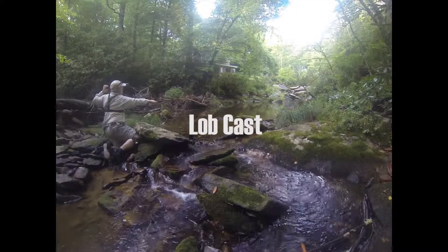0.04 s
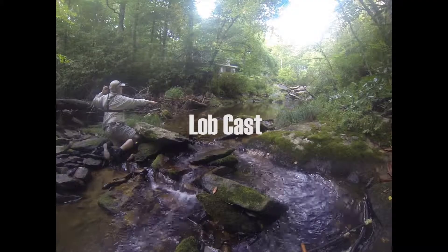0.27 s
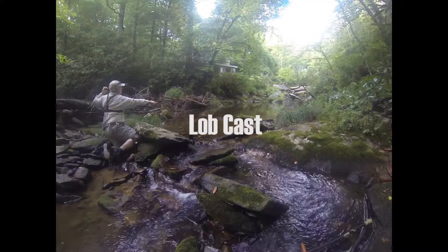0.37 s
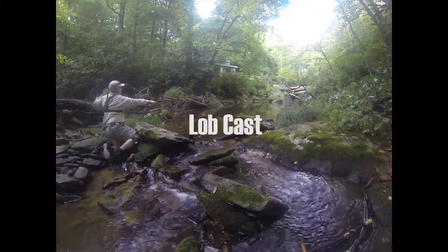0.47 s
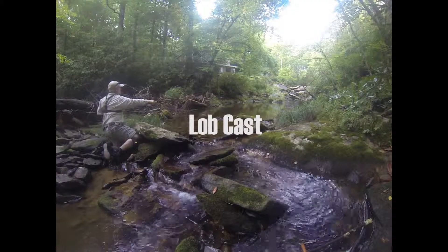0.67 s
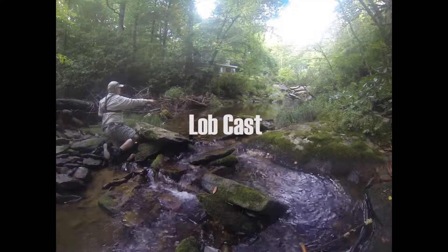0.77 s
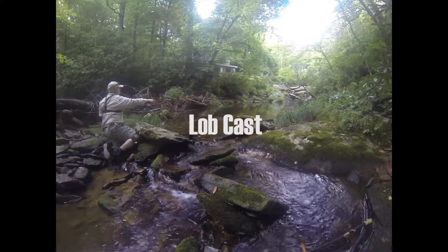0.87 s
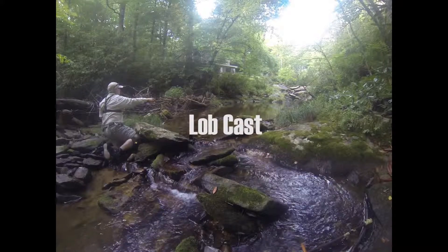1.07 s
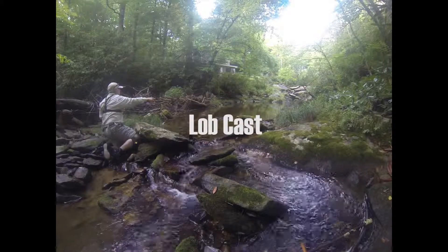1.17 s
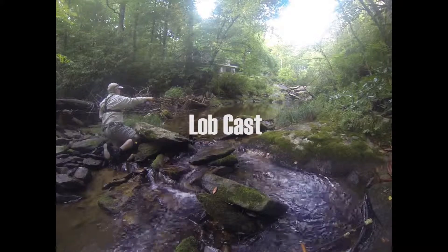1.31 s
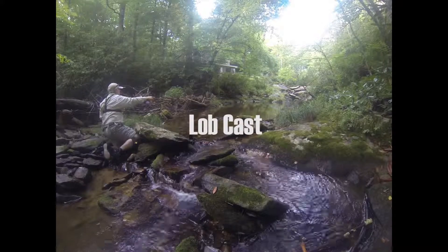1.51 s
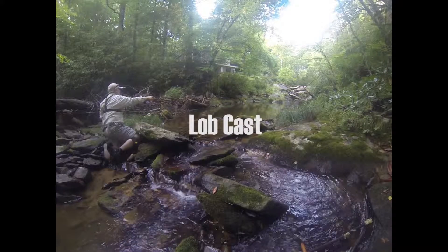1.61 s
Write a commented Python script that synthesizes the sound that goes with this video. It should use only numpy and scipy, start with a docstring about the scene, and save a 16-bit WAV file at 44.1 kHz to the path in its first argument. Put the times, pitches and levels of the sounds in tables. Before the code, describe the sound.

A small stream trickles over rocks with hollow plops, bubbly gulps and a low rush.

```python
"""A small stream trickles over rocks, hollow and dull through a camera's closed waterproof case.
From the start, drops plop into a pool and trapped air bubbles plink, over a bed of low rush, fine
patter and the faint pulsing whine of the camera's electronics. A quarter second in, big bubbles gulp
and the water heaves. Lighter drops follow, bunch into a flurry from 1.2 s, and give way to one soft
gulp at 1.6 s."""
import sys
import numpy as np
from scipy import signal
from scipy.fft import rfft, irfft
from scipy.io import wavfile
from scipy.ndimage import uniform_filter1d

SR = 44100
rng = np.random.default_rng(int(sys.argv[2]) if len(sys.argv) > 2 else 0)


def to_wav(sig):
    """Store sig (one row per channel, or 1-D mono) as 16-bit WAV at the path in sys.argv[1].

    Samples outside -1..1 are clipped; the rate is SR.
    """
    pcm = np.clip(np.atleast_2d(sig), -1, 1) * 32767
    pcm = np.round(pcm).astype(np.int16)
    wavfile.write(sys.argv[1], SR, pcm.T)  # frames by channels


N = 72765
T = np.arange(N) / SR

# tone of the current's rush: (frequency [Hz], relative level [dB])
RUSH_EQ = [(20, -12), (42, -13), (59, 5), (80, -7), (103, 3), (128, -2), (165, -1), (192, 1), (230, -15),
           (600, -11), (790, -24), (980, -14), (1450, -19), (2400, -22), (3600, -32), (5300, -39),
           (7500, -37.5), (13500, -49), (15000, -64)]
# big bubbles: (time [s], pitch [Hz], level [dB], t60 [s], pitch rise over t60 [fraction])
GULP_CUES = [(.2298, 1490, 6.5, .012, .42), (.2790, 1560, -22, .025, .1), (.2838, 1850, -4.5, .022, .07),
             (1.5985, 1225, -18.5, .046, .02)]
# small bubbles: (time [s], pitch [Hz], level [dB], t60 [s])
PLINK_CUES = [(.0170, 530, -36, .06), (.0400, 2100, -42, .04), (.1700, 2900, -26, .01),
              (.1840, 5250, -43, .016), (.3385, 3290, -20, .012), (.4190, 4250, -42, .02),
              (.5520, 3250, -39, .02), (.5810, 1880, -36, .035), (.6545, 560, -32, .055),
              (.7130, 3500, -36, .02), (.8510, 2990, -17, .015), (.9120, 4150, -36, .022),
              (.9633, 3220, -19, .016), (.9640, 3620, -25, .015), (1.0490, 1900, -37, .04),
              (1.0690, 4850, -43, .014), (1.0980, 1950, -34, .045), (1.2210, 3950, -27, .013),
              (1.2280, 4200, -17.5, .007), (1.2295, 4700, -25, .009), (1.3000, 6800, -35, .009),
              (1.3768, 2150, -27, .016), (1.3872, 2850, -20, .018), (1.4380, 2850, -25, .015),
              (1.4695, 6800, -43, .015), (1.6185, 4180, -34, .02)]
# low heave of the water under the first gulp: (time [s], pitch [Hz], level [dB], t60 [s])
HEAVE_CUES = [(.238, 75, -28, .11), (.237, 380, -17, .028)]
# drops hitting the pool: (time [s], plop level [dB], knock level [dB], splash level [dB])
DROP_CUES = [(.0068, -28, -41, -50), (.0176, -22, -34, -44), (.0405, -29, -41, -52), (.0750, -29, -41, -53),
             (.1232, -28, -38, -45), (.1398, -30, -42, -55), (.1703, -17, -32, -42),
             (.2299, -13, -18.5, -52), (.2388, -21, -26, -39), (.2425, -22, -28, -46),
             (.2825, -2.5, -20, -41), (.3384, -19, -23, -36), (.3595, -27, -39, -52),
             (.3929, -22, -36, -50), (.5395, -29, -41, -46), (.5486, -29, -41, -45), (.5820, -29, -34, -48),
             (.6529, -21, -32, -42), (.7143, -28, -39, -48), (.7402, -21, -32, -38), (.8064, -27, -35, -47),
             (.8135, -18, -24, -38), (.8506, -21, -31, -37), (.8776, -28, -40, -48), (.9121, -29, -41, -47),
             (.9639, -19, -26, -35), (.9963, -21, -35, -49), (1.0492, -31, -42, -53),
             (1.1031, -24, -32, -46), (1.1852, -30, -41, -46), (1.2210, -23, -35, -37),
             (1.2285, -17.5, -27, -31), (1.2635, -19.5, -28, -39), (1.2711, -26, -37, -37),
             (1.2805, -28, -39, -43), (1.3008, -20.5, -30, -36), (1.3432, -25, -37, -45),
             (1.3773, -20, -33, -44), (1.3864, -7.5, -26, -33), (1.4377, -16, -28, -35),
             (1.5502, -26, -39, -52)]
# sharp ticks of spray: (time [s], peak level [dB])
TICK_CUES = [(.1230, -50), (.2390, -43), (.8125, -43), (1.2650, -51), (1.3865, -51)]
# tone of a tick: (frequency [Hz], relative level [dB])
TICK_EQ = [(3000, -14), (7500, -5), (9000, -7), (10600, 0), (12500, -16), (15000, -30)]
# tone of a splash: (frequency [Hz], relative level [dB])
SPLASH_EQ = [(300, -30), (2300, -13), (2950, -2), (3650, 0), (4400, -1), (5500, -16), (6900, -18),
             (8800, -34), (15000, -50)]
# tone of a drop's knock through the case: (frequency [Hz], relative level [dB])
KNOCK_EQ = [(40, -12), (250, -3), (400, 2), (560, 1), (780, -8), (960, 0), (1500, -3), (2050, 5),
            (2400, -2), (3000, -12), (5500, -35), (14000, -58)]
# resonances of the case: (pitch [Hz], level against the knock [dB], t60 [s])
CASE_RINGS = [(190, -27, .2), (325, -21, .08), (420, -18, .04), (485, -19, .06), (555, -18, .07),
              (635, -22, .05), (986, -11.5, .09), (1320, -19, .05)]

WHINE_HZ, WHINE_PULSE_HZ, WHINE_ON_S, WHINE_OFFSET_S = 6455, 47.96, .0085, .0177
FIZZ_PER_S, FIZZ_LOW_HZ, FIZZ_HIGH_HZ = 70, 1700, 5000
GULP_SWELL_S, PLINK_SWELL_S, PLINK_RISE = .0014, .0009, .08
PLOP_HZ, PLOP_S, PLOP_RISE, PLOP_SPREAD = 1280, .0028, .26, .055  # rise and spread: fractions of pitch
PLOP_LEAD_S = .0004  # the impact lands just ahead of its splash
TAIL_DB, TAIL_T60_S = -13, .045
FLUTTER_S, FLUTTER_DB = .00302, -8.5  # per round trip of the echo in the case


def undb(db):
    """Decibels to gain."""
    return 10 ** (np.asarray(db) / 20)


def level(x, db):
    """Set the rms level."""
    return x * undb(db) / np.sqrt(np.mean(x ** 2))


def fade(t, t60):
    """Exponential decay, 60 dB down after t60 seconds."""
    return np.exp(-np.log(1000) * t / t60)


def add(out, s, x):
    """Mix a sound in at s seconds."""
    i = min(max(int(s * SR), 0), N)
    out[i:i + len(x)] += x[:N - i]


def through(x, response):
    """Pass a sound through an impulse response."""
    return signal.fftconvolve(x, response)[:N]


def colour(eq, size=8192):
    """Minimum-phase impulse response of an EQ curve, with peak 1."""
    hz, db = np.array(eq).T
    bins_hz = np.maximum(np.arange(size // 2 + 1) * SR / size, 1)
    gain = undb(np.interp(np.log(bins_hz), np.log(hz), db))
    cepstrum = irfft(np.log(gain))
    cepstrum[1:size // 2] *= 2
    cepstrum[size // 2 + 1:] = 0
    response = irfft(np.exp(rfft(cepstrum)))
    return response / np.abs(response).max()


def drift(rate_hz):
    """Slow random wander with a spread near 1."""
    step = int(SR / rate_hz)
    return uniform_filter1d(np.repeat(rng.standard_normal(N // step + 1), step), step)[:N]


def shower(per_s, spread_db):
    """Randomly timed clicks of uneven size and polarity."""
    hits = rng.random(N) < per_s / SR
    gains = undb(spread_db * np.clip(rng.standard_normal(N), -2, 2))
    return hits * gains * np.sign(rng.standard_normal(N))


def space(x, size=4096):
    """Rocks and water surface add a short diffuse tail; then the sound flutters to and fro in the case."""
    t = T[:size]
    tail = rng.standard_normal(size) * fade(t, TAIL_T60_S) * np.minimum(t / FLUTTER_S, 1) ** 2
    tail *= undb(TAIL_DB) / np.linalg.norm(tail)
    tail[0] = 1  # the direct sound
    trips, offset = np.divmod(np.arange(size), round(FLUTTER_S * SR))
    flutter = (offset == 0) * undb(FLUTTER_DB * trips)
    return through(x, through(tail, flutter))


def whine():
    """The electronics whistle in short regular pulses, with a softer octave on top."""
    pulse_age = (T - WHINE_OFFSET_S) % (1 / WHINE_PULSE_HZ)
    gate = uniform_filter1d(1. * (pulse_age < WHINE_ON_S), size=30)
    phase = 2 * np.pi * np.cumsum(WHINE_HZ + 20 * drift(rate_hz=100)) / SR
    return gate * (undb(-56.5) * np.sin(phase) + undb(-64.5) * np.sin(2 * phase))


def current():
    """The bed of the stream: a low, gently surging rush."""
    response = colour(RUSH_EQ)
    noise = rng.standard_normal(N + len(response) - 1)
    rush = signal.fftconvolve(noise, response, mode="valid")
    surge_db = 1.5 * drift(rate_hz=14)
    return level(rush * undb(surge_db), db=-44.6)


def patter():
    """Fine droplets lay down a texture of tiny plops under a bright mist of spray."""
    droplets = through(shower(per_s=200, spread_db=2.8), plop(db=0, knock_db=-11, hz=PLOP_HZ))
    droplets = space(droplets)
    mist = through(shower(per_s=260, spread_db=4), colour(SPLASH_EQ))
    return level(droplets, db=-51) + level(mist, db=-67)


def fizz():
    """Faint bubbles of mixed sizes ring at random, the higher ones softer."""
    out = np.zeros(N)
    for when, height, strength in rng.random((int(FIZZ_PER_S * N / SR), 3)):
        hz = FIZZ_LOW_HZ * (FIZZ_HIGH_HZ / FIZZ_LOW_HZ) ** height
        accent_db = 4 * min(-np.log(1 - strength), 3)  # a few poke out
        db = -53 + accent_db - 6 * height
        add(out, when * N / SR, bubble(hz, db, t60=.018))
    return out


def bubble(hz, db, t60, swell_s=PLINK_SWELL_S, rise=PLINK_RISE):
    """Trapped air swells into ringing and dies away, bending up by the fraction rise over t60."""
    t = T[:int(1.5 * t60 * SR)]
    envelope = (1 - np.exp(-(t / swell_s) ** 2)) * fade(t, t60)
    return undb(db) * envelope * np.sin(2 * np.pi * hz * t * (1 + rise * t / t60 / 2))


def bubbles():
    """Close up, big bubbles gulp and small ones plink; the first gulp heaves the water."""
    out = np.zeros(N)
    for s, hz, db, t60, rise in GULP_CUES:
        add(out, s, space(bubble(hz, db, t60, GULP_SWELL_S, rise)))
    for s, hz, db, t60 in PLINK_CUES:
        add(out, s, space(bubble(hz, db, t60)))
    for s, hz, db, t60 in HEAVE_CUES:
        add(out, s, bubble(hz, db, t60, swell_s=.004, rise=0))
    return out


def spatter(eq, peak_db, t60):
    """Flung spray: a short burst of coloured noise."""
    noise = rng.standard_normal(size=512)
    t = T[:len(noise)]
    attack = 1 - np.exp(-t / .001)
    spray = through(noise * attack * fade(t, t60), colour(eq))
    return undb(peak_db) * spray / np.abs(spray).max()


def plop(db, knock_db, hz):
    """A drop opens a cavity that chirps upward, and its hollow knock sets the case ringing."""
    knock = colour(KNOCK_EQ)
    t = T[:len(knock)]
    age = np.minimum(t / PLOP_S, 1)
    cavity = np.sin(np.pi * age) ** 2 * np.cos(2 * np.pi * hz * t * (1 + PLOP_RISE * age / 2))
    rings = sum(undb(ring_db) * fade(t, t60) * np.cos(2 * np.pi * ring_hz * t)
                for ring_hz, ring_db, t60 in CASE_RINGS)
    rings *= 1 - np.exp(-(t / .001) ** 2)  # soft attack
    contact_s = .0002 * (1 + 2.5 * undb(db))  # big drops push longer, so they sound rounder
    push = np.sin(np.pi * np.minimum(t / contact_s, 1)) ** 2
    return through(undb(db) * cavity + undb(knock_db) * (knock + rings), push / push.sum())


def drops():
    """Foreground drops hit the pool, each a plop topped with a splash; a few sharp ticks add edge."""
    out = np.zeros(N)
    for s, db, knock_db, splash_db in DROP_CUES:
        hz = PLOP_HZ * (1 + PLOP_SPREAD * rng.standard_normal())
        add(out, s - PLOP_LEAD_S, space(plop(db, knock_db, hz)))
        add(out, s, space(spatter(SPLASH_EQ, splash_db, t60=.009)))
    for s, db in TICK_CUES:
        add(out, s, spatter(TICK_EQ, db, t60=.012))
    return out


def scene():
    """The stream and the camera's whine, mixed in mono."""
    return (drops() + patter() + bubbles() + fizz() + current() + whine())[None]


def record(dry):
    """A steep low-pass shaves off the top end."""
    top_hz = 14700
    return signal.sosfilt(signal.ellip(8, .2, 70, top_hz, fs=SR, output="sos"), dry)


dry = scene()
out = record(dry)
to_wav(out)
```